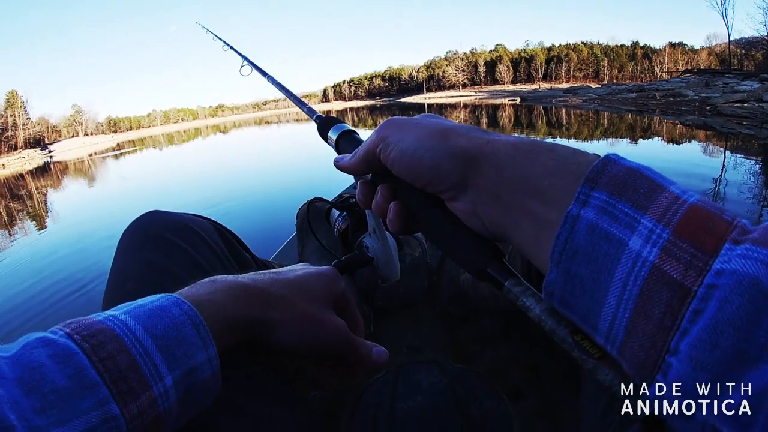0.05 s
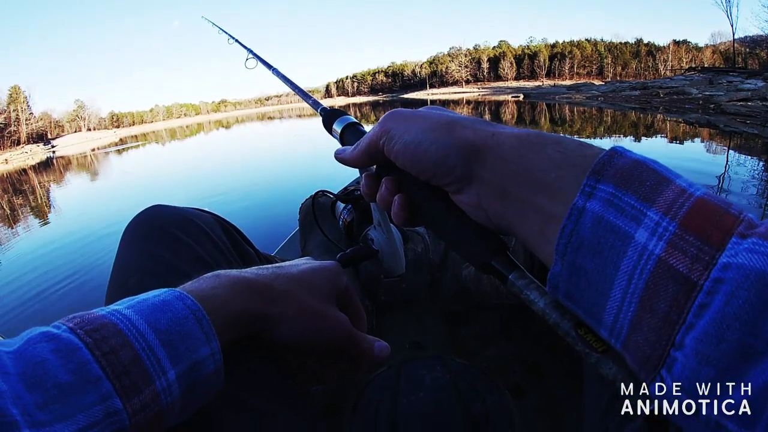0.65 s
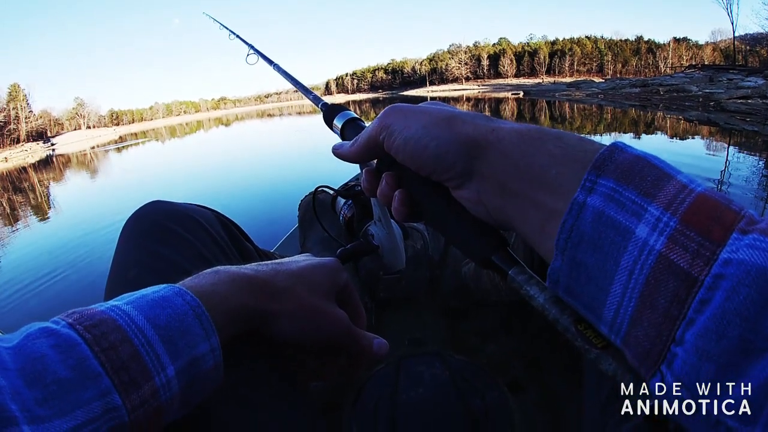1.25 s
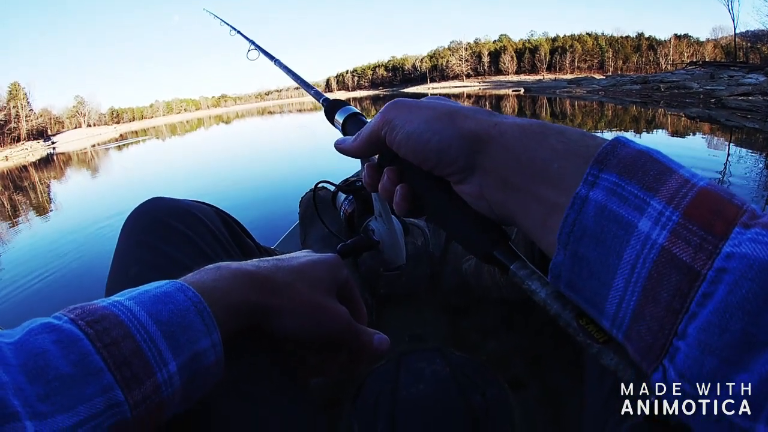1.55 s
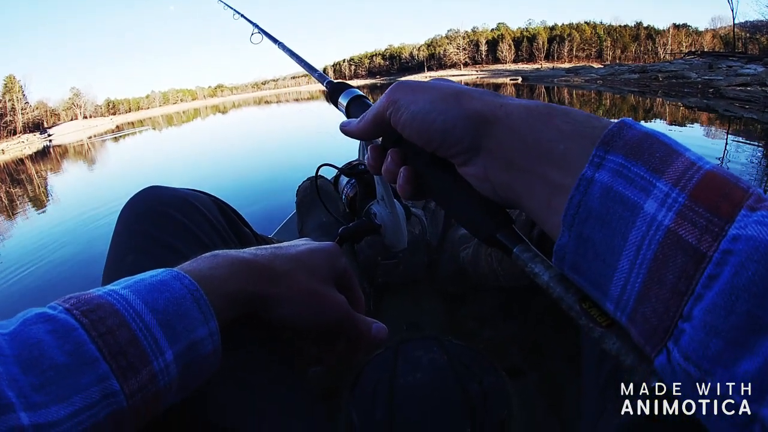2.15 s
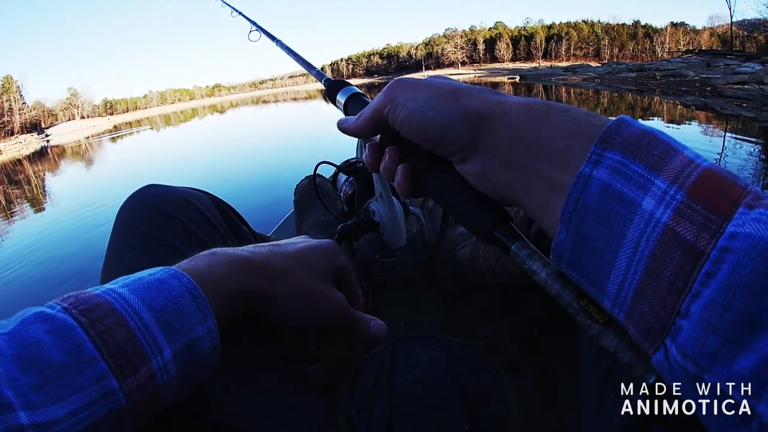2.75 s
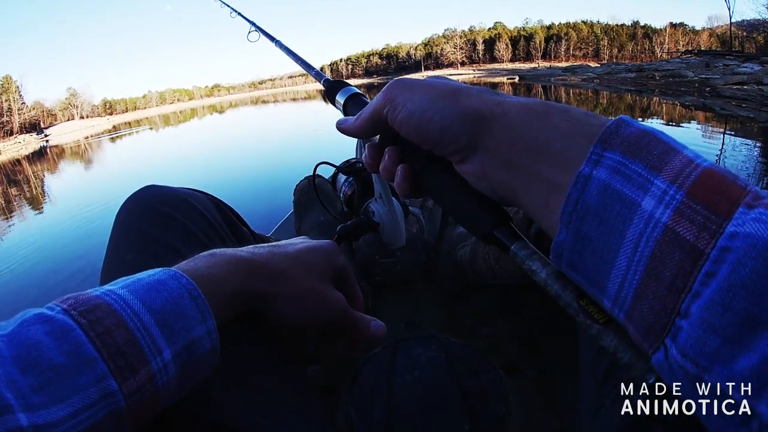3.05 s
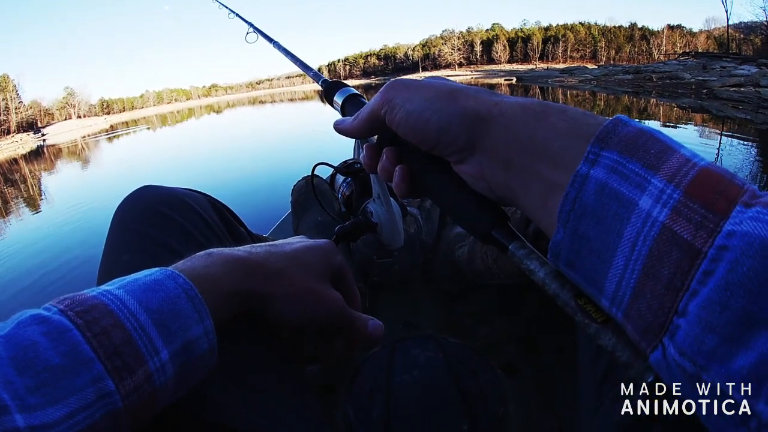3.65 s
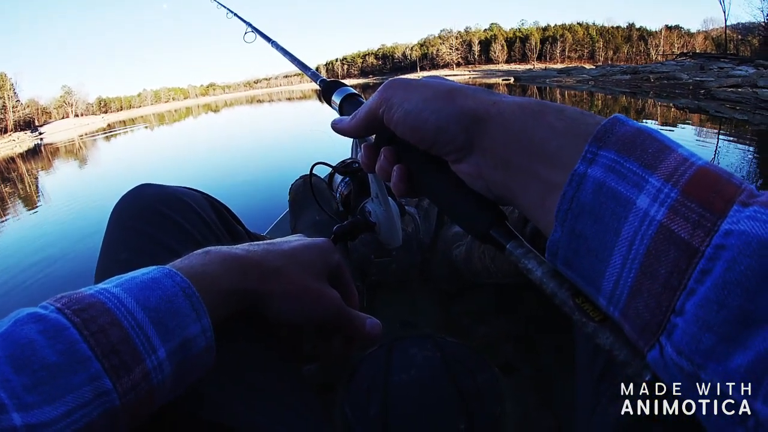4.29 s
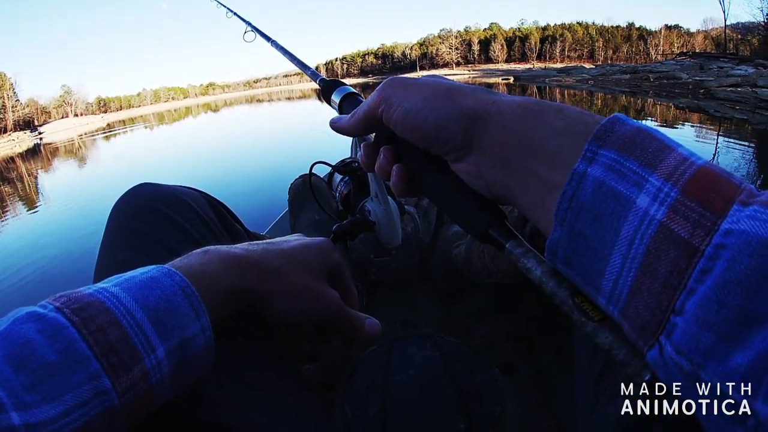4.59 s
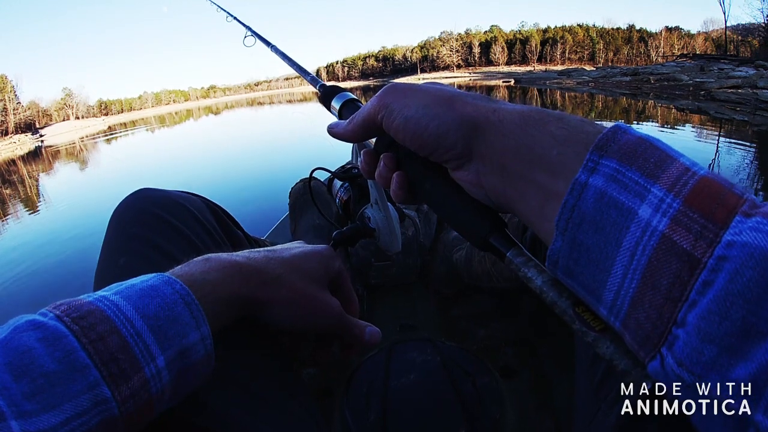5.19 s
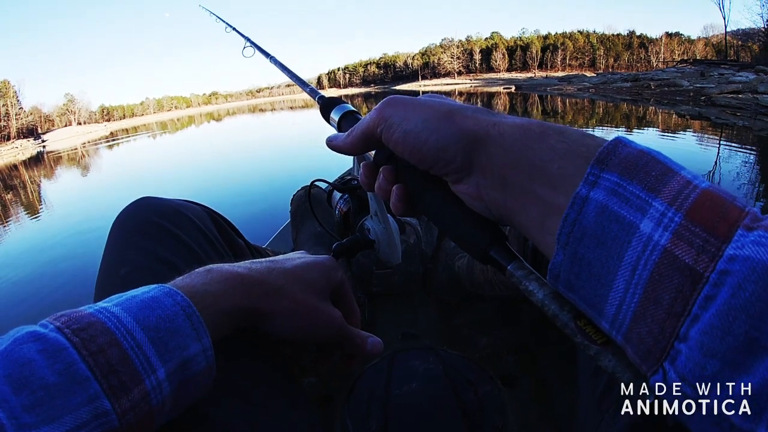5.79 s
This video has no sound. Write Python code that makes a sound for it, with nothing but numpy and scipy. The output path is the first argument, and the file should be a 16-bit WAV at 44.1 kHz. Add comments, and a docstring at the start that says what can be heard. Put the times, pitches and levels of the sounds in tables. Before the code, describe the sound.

A distant motor hums low throughout, with a rough rumble beneath it, swelling gently and easing a little after 4 seconds. A faint dull roar hangs over the lake, strongest around 1 to 2 seconds. At the start, water washes softly along a kayak's hull, and small plops follow here and there. From about 1.5 to 2.1 seconds a sleeve rustles close by and a hand bumps a fishing rod lightly several times, ending with a small metallic reel click. At 2.3 seconds a little splash breaks into drops and bubbles, with gurgling plops until 2.8. A second small splash starts with a sharp slap at 4.6 seconds and trickles away just after 5. A faint reel tick and a plop come near 5.8 seconds. The whole scene is quiet and free of echo, with a soft microphone hiss behind it.

```python
"""A far motor hums across a calm lake; only its low firing notes carry to a resting kayak.
Under a dull far roar, water washes along the hull and trapped air plops and gurgles.
Two small splashes break into drops and ringing bubbles. A sleeve rustles, a hand bumps
the fishing rod and the reel ticks. The camera adds a soft hiss and a very faint, even ticking."""
import sys
import numpy as np
from scipy import signal
from scipy.fft import rfft, irfft
from scipy.io import wavfile

SR = 44100
rng = np.random.default_rng(int(sys.argv[2]) if len(sys.argv) > 2 else 0)


def wav_out(sig):
    """Save sig, one row per channel (or a flat mono array), as 16-bit PCM at SR to the path in sys.argv[1]."""
    wavfile.write(sys.argv[1], SR, np.round(np.clip(np.atleast_2d(sig).T, -1, 1) * 32767).astype(np.int16))


N = 257103
TIME = np.arange(N) / SR
FREQS = np.fft.rfftfreq(N, 1 / SR)
TOP_HZ = 15700


def amp(db):
    """Turns decibels into a number to multiply by."""
    return 10 ** (np.asarray(db) / 20)

def unit(x):
    """Scales a signal to an average strength (rms) of 1."""
    return x / np.sqrt(np.mean(x ** 2) + 1e-20)

def curve(rows):
    """Joins (time, value) points with straight lines."""
    return np.interp(TIME, *np.transpose(rows))

def gain_at(tone, hz):
    """Reads gains from a tone table, which says how strong each frequency is next to the others."""
    points_hz, db = np.transpose(tone)
    return amp(np.interp(np.log(hz + 1), np.log(points_hz), db))

def colour(x, tone):
    """Filters a signal by a tone table, at strength 1."""
    return unit(irfft(rfft(x) * gain_at(tone, FREQS), N))

def noise(tone):
    """Steady noise with the given tone."""
    return colour(rng.standard_normal(N), tone)

def drift(hz):
    """A smooth random wander of strength 1, up to about hz fast."""
    return unit(irfft(rfft(rng.standard_normal(N)) * np.exp(-(FREQS / hz) ** 2), N))

def patchy(x, depth_db, rate_hz, count=9):
    """Splits a sound into bands from low to high and lets each flicker on its own."""
    place = np.interp(np.log(FREQS + 1), np.log([700, 11000]), [0, count - 1])
    spectrum = rfft(x)
    bands = (irfft(spectrum * np.maximum(1 - abs(place - k), 0), N) for k in range(count))
    return unit(sum(band * amp(depth_db * drift(rate_hz)) for band in bands))

def add(mix, start, sound):
    """Lays a sound into the mix, start seconds in."""
    part = mix[round(start * SR):][:len(sound)]
    part += sound[:len(part)]

def ringing(notes, t, tuning=1):
    """The notes of a struck part; each fades by 60 dB over its ring time."""
    return sum(amp(db) * np.exp(-np.log(1000) * t / ring_s) * np.sin(2 * np.pi * hz * tuning * t)
               for hz, db, ring_s in notes)

def air_note(t, hz, rise, rough, wobble_hz):
    """Air trapped in water sings a wobbling note that climbs by rise octaves a second."""
    turns = np.cumsum(hz * 2 ** (rise * t)) / SR
    rate, start = rng.random((2, 8, 1))
    wobble = np.exp(2j * np.pi * (wobble_hz * (2 * rate - 1) * t + start)).sum(0) / np.sqrt(len(rate))
    return (np.exp(2j * np.pi * turns) * (1 + rough * wobble)).imag

def bubble(hz, ring_s, rise, rough=0.62):
    """One bubble rings and fades, climbing in pitch as it nears the surface."""
    t = np.arange(0, ring_s, 1 / SR)
    onset = 1 - np.exp(-t / (0.054 * ring_s))
    fade = np.exp(-np.log(1000) * t / ring_s)
    return air_note(t, hz, rise, rough, wobble_hz=350) * onset * fade


# tone of the hiss: f/Hz, level/dB
HISS_TONE = [(100, 10), (2000, 2), (4200, -1.5), (5900, 3), (6400, -3), (7200, -1), (8000, -7.5),
             (9000, -9.5), (10200, -9), (11200, -16), (12600, -15.5), (13100, -32), (15500, -31)]
# tone of the electrical ticks: f/Hz, level/dB
TICK_TONE = [(4000, -12.5), (5700, -3), (7400, -1.5), (8300, -14), (10000, -16.5), (13000, -28),
             (15000, -47)]

def camera(hiss_db=-76, tick_db=-74, period_s=1 / 30, first_s=.0182, width_s=0.0025):
    """The microphone hisses, and the electronics tick faintly at an even pace."""
    from_tick = (TIME - first_s + period_s / 2) % period_s - period_s / 2
    pulses = np.exp(-(from_tick / width_s) ** 2)
    ticks = noise(TICK_TONE) * pulses * amp(tick_db + 2 * drift(60))
    return amp(hiss_db) * noise(HISS_TONE) + ticks


# tone of the far roar: f/Hz, level/dB
ROAR_TONE = [(120, -27.5), (220, -17), (290, -7), (400, -5.5), (500, -11), (660, -6.5), (850, -17),
             (1100, -31), (2200, -63.5)]
# its rise and fall, before trim_db is added: t/s, level/dB
ROAR_LEVEL = [(0, -65.5), (.6, -59.5), (1.0, -57.5), (1.2, -58), (1.45, -59), (1.8, -56), (1.97, -58.5),
              (2.11, -56), (2.25, -58.5), (2.75, -60), (3.1, -61), (4.3, -64.5), (4.82, -63), (5.1, -63),
              (5.83, -61.5)]

def far_roar(trim_db=-1):
    """A dull roar over the lake swells unevenly and settles."""
    return noise(ROAR_TONE) * amp(curve(ROAR_LEVEL) + trim_db + 0.3 * drift(5.2))


# tone of the washing water: f/Hz, level/dB
WASH_TONE = [(200, -13), (380, 15), (550, 0), (800, 6), (1100, 4.5), (1400, 4), (1800, -18), (3000, -16.5),
             (8000, -39)]
# crests of the low waves: t/s, level/dB
WAVE_CRESTS = [(.05, -63.5), (.9, -68.5), (1.55, -70.5), (2.5, -71.5)]

def hull_wash(calm_db=-81, rise_s=0.23, fall_db_per_s=17.5):
    """Each low wave builds up, then drains away along the hull."""
    power = amp(calm_db) ** 2
    for crest, db in WAVE_CRESTS:
        before, after = np.maximum(crest - TIME, 0), np.maximum(TIME - crest, 0)
        wave = np.exp(-(before / rise_s) ** 2) * amp(db - fall_db_per_s * after)
        power = power + wave ** 2
    return noise(WASH_TONE) * np.sqrt(power) * amp(drift(23))

def ripples(count=60, middle_hz=670):
    """Tiny waves plop against the hull at random."""
    out = np.zeros(N)
    for when, size, pitch in rng.random((count, 3)):
        hz = middle_hz * 2 ** (.4 * (pitch - .5))
        add(out, when * TIME[-1], amp(-63 + 1.3 * size) * bubble(hz, ring_s=0.027, rise=0.71))
    return out


# tone of the sleeve sliding on the jacket: f/Hz, level/dB
SLEEVE_TONE = [(300, -23.5), (900, -0.5), (1200, 4.5), (1450, 8), (1750, -1), (2250, -10), (2750, 0.5),
               (3200, -3.5), (4000, -2), (5500, -6.5), (7600, -5.5), (9000, -17), (12500, -38),
               (15000, -56)]
# its loudness as the arm shifts: t/s, level/dB
SLEEVE_LEVEL = [(0.1, -74), (.3, -85), (1.45, -88), (1.58, -66), (1.66, -77), (1.77, -64), (1.86, -69.5),
                (1.95, -66.5), (2.06, -68.5), (2.17, -85)]

def sleeve(grain_db=1.9):
    """Cloth fibres slip in small clumps, making one unbroken scrape that follows the arm."""
    scrape = patchy(noise(SLEEVE_TONE), depth_db=2, rate_hz=49)
    return scrape * amp(curve(SLEEVE_LEVEL) + grain_db * drift(110))


# knocks of the hand: t/s, peak level/dB, contact pitch/Hz, spread around it/octaves, scuff time/s
KNOCKS = [(1.5929, -48, 4000, .5, 0.0017), (1.5944, -42.5, 2100, 1.15, .0006),
          (1.6999, -43, 794, 0.15, .0003), (1.825, -46, 2140, .38, 0.0027), (1.8902, -46.5, 4070, .2, .002)]
# notes of the rod and its grip: f/Hz, level/dB, ring time/s
ROD_NOTES = [(820, -5, 0.02), (1320, 2, 0.015), (1780, -10.5, 0.011), (2800, -3.5, 0.009),
             (3980, -5, 0.0067), (4740, -4, 0.0043)]

def rod(scuff=0.086, reach_octaves=1.1):
    """A hand bumps the rod; each soft, scuffing touch wakes mostly the notes near its own pitch."""
    out, t = np.zeros(N), np.arange(0, .03, 1 / SR)
    for start, db, contact_hz, spread, scuff_s in KNOCKS:
        push = scuff * rng.standard_normal(len(t)) * np.exp(-t / scuff_s)
        push[0] = 1
        cutoff_hz = min(contact_hz * 2 ** reach_octaves, TOP_HZ)  # a soft fingertip dulls the knock
        push = signal.lfilter(*signal.butter(2, cutoff_hz, fs=SR), push)
        notes = [(hz, note_db - 10 * np.log10(1 + (np.log2(hz / contact_hz) / spread) ** 4), ring_s)
                 for hz, note_db, ring_s in ROD_NOTES]
        knock = signal.fftconvolve(push, ringing(notes, t))
        add(out, start, amp(db) * knock / abs(knock).max())
    return out


# ticks of the reel: t/s, peak level/dB, tuning (multiplies each note's frequency)
REEL_TICKS = [(1.7075, -59, 1.3), (1.8245, -65, 1.2), (1.89, -58, 1.05), (2.05, -41, 0.983),
              (5.7830, -63.5, 1.36)]
# notes of the reel: f/Hz, level/dB, ring time/s
REEL_NOTES = [(5600, -10, 0.0048), (6740, 6.5, 0.0036), (8070, -10, 0.012), (9300, -22, 0.0046),
              (12200, -35, .004)]
# notes of its spring, shaken by a knock: f/Hz, level/dB, ring time/s
SPRING_NOTES = [(13800, -81, 0.06), (14100, -82, .07)]

def reel(onset_s=0.00043, spring_start_s=1.703):
    """Small metal parts of the reel click into place, and its spring sings briefly."""
    out, t = np.zeros(N), np.arange(0, .08, 1 / SR)
    for start, db, tuning in REEL_TICKS:
        tick = ringing(REEL_NOTES, t, tuning) * (1 - np.exp(-t / onset_s))
        add(out, start, amp(db) * tick / abs(tick).max())
    add(out, spring_start_s, ringing(SPRING_NOTES, t))
    return out


# plops, which hold nearly one note: t/s, level/dB, starting f/Hz, length/s
PLOPS = [(.611, -59, 670, .022), (.778, -51.5, 640, .025), (1.209, -54, 693, .022), (1.646, -57, 820, .012),
         (2.551, -50.5, 664, 0.026), (2.655, -54, 607, 0.021), (2.761, -50, 645, .016),
         (2.085, -53.5, 630, 0.044), (3.605, -57, 625, .03), (4.742, -56.5, 650, 0.017),
         (5.035, -60, 740, .035), (5.804, -58, 690, .02)]
# gurgles, which climb fast: t/s, level/dB, starting f/Hz, length/s
GURGLES = [(2.497, -57.5, 930, 0.027), (2.604, -65, 1020, 0.03), (4.707, -57.5, 870, 0.045),
           (4.938, -56, 514, 0.06), (4.971, -60, 822, 0.045)]

def air_pockets(plop_rise=2.2, gurgle_rise=12.5):
    """Air is squeezed against the hull: each note swells, climbs and closes."""
    out = np.zeros(N)
    for rows, rise in (PLOPS, plop_rise), (GURGLES, gurgle_rise):
        for start, db, hz, length in rows:
            t = np.arange(0, length, 1 / SR)
            swell = np.sin(np.pi * (t / length) ** 0.34) ** 2
            add(out, start, amp(db) * swell * air_note(t, hz, rise, rough=0.18, wobble_hz=130))
    return out


# the two splashes: t/s, level/dB, hold time/s, level of the lingering trickle/dB
SPLASHES = [(2.319, -65.5, 0.1, -100), (4.588, -69, 0.2, -84.5)]

def splash_level(onset_s=0.025, fall_db_per_s=37):
    """The loudness that spray and drips follow: a quick rise, a hold, then a fall to a trickle."""
    level = np.zeros(N)
    for start, db, hold_s, trickle_db in SPLASHES:
        onset = np.clip((TIME - start) / onset_s, 0, 1)
        fall_db = fall_db_per_s * np.maximum(TIME - start - hold_s, 0)
        level += onset * np.hypot(amp(db - fall_db), amp(trickle_db))
    return level


# tone of the fine spray: f/Hz, level/dB
SPRAY_TONE = [(400, -8), (1000, 7), (1500, 10), (2000, 2), (2800, 8), (3300, 6.5), (4000, 4.5), (5700, 5.5),
              (6800, 1), (8000, -4), (10200, -10), (12500, -25), (15000, -43)]

def spray(drops_per_s=1300, mist=0.21, bubble_count=1700, patter_db=1, fizz_db=9):
    """Fine drops rain back in clumps after a splash, and some trap tiny bubbles."""
    drops = rng.standard_normal(N) * (mist + (rng.random(N) < drops_per_s / SR))
    fizz = np.zeros(N)
    for when, size, pitch in rng.random((bubble_count, 3)):
        hz = 950 * 3.6 ** pitch
        ring = bubble(hz, ring_s=45 / hz, rise=5.6)  # small, high bubbles die sooner
        add(fizz, when * TIME[-1], size ** 3 * ring)
    patter = patchy(colour(drops, SPRAY_TONE), depth_db=3, rate_hz=140)
    return splash_level() * (amp(patter_db) * patter + amp(fizz_db) * fizz)

def drips(count=110, middle_hz=2750, spread_octaves=0.58, boost_db=8):
    """Larger drops fall among the spray, each a short plink."""
    out = np.zeros(N)
    for when, size, pitch in rng.random((count, 3)):
        hz = middle_hz * 2 ** (spread_octaves * (pitch - .5))
        add(out, when * TIME[-1], size * bubble(hz, ring_s=0.045, rise=2.1))
    return amp(boost_db) * splash_level() * out


# larger bubbles from the splashes: t/s, level/dB, starting f/Hz, ring time/s
BUBBLES = [(2.3507, -41.5, 3300, .010), (2.383, -51, 1330, 0.023), (2.399, -52.5, 1470, 0.017),
           (2.372, -52, 2760, 0.017), (2.461, -57, 2750, 0.047), (2.473, -57, 2300, 0.026),
           (2.548, -54.5, 2610, 0.033), (4.646, -55, 1330, .03), (4.708, -47, 1520, .017),
           (4.7526, -43, 2420, 0.021), (4.799, -50.5, 1025, 0.036), (4.8373, -51.5, 3280, 0.021),
           (4.841, -54, 1425, 0.033), (5.014, -61, 3200, 0.017)]

def big_bubbles(pop_s=0.00049, fizz_octaves=0.52):
    """Each bubble pinches off with a pop and rings in wet fizz."""
    out = np.zeros(N)
    for start, db, hz, ring_s in BUBBLES:
        ring = bubble(hz, ring_s, rise=1.8, rough=0.39)
        t = np.arange(len(ring)) / SR
        edges_hz = hz * 2 ** (fizz_octaves * np.array([-.5, .5]))
        band = signal.butter(3, edges_hz, "band", fs=SR, output="sos")
        fizz = unit(signal.sosfilt(band, rng.standard_normal(2 * len(t)))[len(t):])
        pop = 0.175 * t / pop_s * np.exp(1 - t / pop_s)
        wet_tail = 0.077 * np.sin(np.pi * np.sqrt(t / ring_s))
        add(out, start, amp(db) * (ring + fizz * (pop + wet_tail)))
    return out


# slaps of water and falling drops: t/s, peak level/dB, lowest f/Hz, highest f/Hz, fade time/s
SLAPS = [(2.25, -59.5, 1300, 1910, 0.014), (2.312, -57, 2300, 3400, 0.0037),
         (2.3492, -39, 3020, 6500, 0.0026), (2.3516, -34, 3800, 15000, 0.0011),
         (2.358, -46, 5000, 8000, .001), (2.4089, -38.5, 2180, 13500, 0.0016),
         (2.4125, -47.5, 2300, 3800, 0.0066), (2.413, -50.5, 4500, 11000, 0.006),
         (2.585, -58, 3000, 7000, 0.0024), (2.637, -51, 4200, 6950, 0.0022), (2.687, -60, 2200, 3300, .002),
         (2.712, -62, 2400, 4000, 0.0017), (2.766, -57.5, 2000, 3300, 0.00096),
         (4.593, -51.5, 2695, 4400, 0.0016), (4.6198, -29, 500, 7850, 0.0007),
         (4.698, -49, 2200, 5070, 0.0063), (4.703, -55, 3500, 10000, 0.0018),
         (4.8, -54, 3400, 9000, 0.0018), (4.826, -52.5, 5000, 9000, 0.0017),
         (4.838, -57, 2800, 8000, 0.0018), (4.934, -63, 2600, 4000, 0.0012),
         (5.002, -63, 1800, 3000, .0012)]
# tone of a slap: f/Hz, level/dB
SLAP_TONE = [(300, 11), (750, 12), (1150, 0), (1500, 8), (2050, -6), (2550, 6.5), (3150, 10), (3900, -7),
             (4300, -2.5), (5400, -3.5), (6000, 1), (7050, 4), (7800, -5), (8400, -3.5), (10200, -4),
             (11200, -19), (12700, -21), (13800, -22), (15500, -41)]

def slaps(full_spatter_s=.009):
    """Water meets water: one sharp pulse and a brief spatter behind it."""
    out, t = np.zeros(N), np.arange(2048) / SR
    hz = np.fft.rfftfreq(2 * len(t), 1 / SR)
    for start, db, low_hz, high_hz, fade_s in SLAPS:
        spatter = min(fade_s / full_spatter_s, 1)  # the briefest slaps are almost a clean pulse
        burst = spatter * rng.standard_normal(len(t)) * np.exp(-t / fade_s)
        burst[0] = -1
        low_cut, high_cut = 1 + (low_hz / (hz + 50)) ** 6, 1 + (hz / high_hz) ** 8
        gain = gain_at(SLAP_TONE, hz) / np.sqrt(low_cut * high_cut)
        # a "minimum phase" filter: nothing sounds before the impact
        log_gain = np.log(np.r_[gain, gain[-2:0:-1]])
        response = np.exp(np.conj(signal.hilbert(log_gain)))[:len(hz)]
        slap = irfft(rfft(burst, 2 * len(t)) * response)
        add(out, start, amp(db) * slap / abs(slap).max())
    return out


# tone of the motor's rumble: f/Hz, level/dB
RUMBLE_TONE = [(20, -5), (35, -6), (52, 3.5), (85, 3), (135, 1), (170, 3), (225, 1.5), (260, -7),
               (330, -19), (600, -74)]
# its loudness: t/s, level/dB
RUMBLE_LEVEL = [(0, -54), (1.8, -53.5), (2.7, -55), (3.6, -52.5), (4.5, -57.5), (5.83, -55)]

def motor_rumble():
    """The far motor makes a low, rough noise under its hum."""
    return noise(RUMBLE_TONE) * amp(curve(RUMBLE_LEVEL))


# pitch of the motor's lowest note: t/s, f/Hz
HUM_PITCH = [(0, 94.9), (1.2, 96.42), (2.6, 96.8), (3.7, 97.24), (5.83, 96.2)]
# that note fades as the motor draws away: t/s, level/dB
HUM_LEVEL = [(0, -44.5), (1.5, -48.5), (2.6, -49), (4.05, -47.5), (4.8, -51.5), (5.83, -52.5)]
# moments when it carries better over the water: t/s, extra level/dB
HUM_SWELLS = [(.25, 4), (1.059, 5.5), (2.0, 4), (2.88, 4.5), (3.25, 4), (3.71, 5.5)]
# the note an octave higher, before upper_trim_db is added: t/s, level/dB
OCTAVE_LEVEL = [(0, -55), (.95, -53), (1.25, -55.5), (2.6, -51), (2.8, -55.5), (3.7, -53.5), (4.4, -59.5),
                (5.83, -61)]
# weak notes above those: multiple of the lowest pitch, level/dB next to the octave note
OVERTONES = [(3, -30), (4, -21.5)]

def motor_hum(waver=0.0014, swell_s=0.18, flutter_db=.5, upper_trim_db=-3):
    """Only the motor's lowest firing notes carry this far; moving air makes them swell and waver."""
    hz = curve(HUM_PITCH) * (1 + waver * drift(6.2))
    phase = 2 * np.pi * np.cumsum(hz) / SR
    lift_db = sum(db * np.exp(-((TIME - crest) / swell_s) ** 2) for crest, db in HUM_SWELLS)
    lowest = amp(curve(HUM_LEVEL) + lift_db + flutter_db * drift(28)) * np.sin(phase)
    upper = np.zeros(N)
    for multiple, db in [(2, 0)] + OVERTONES:
        upper += amp(db + drift(9.8)) * np.sin(multiple * phase + rng.uniform(0, 2 * np.pi))
    return np.sqrt(2) * (lowest + amp(curve(OCTAVE_LEVEL) + upper_trim_db) * upper)


def scene():
    """Adds everything into one channel, in open air with no echo."""
    lake = far_roar() + hull_wash() + ripples()
    splashing = spray() + drips() + slaps() + big_bubbles()
    water = lake + splashing + air_pockets()
    motor = motor_hum() + motor_rumble()
    return (motor + water + sleeve() + rod() + reel() + camera())[None]

def record(dry):
    """Cuts away the treble above TOP_HZ."""
    low_pass = signal.firwin(511, TOP_HZ, window=("kaiser", 9), fs=SR)
    return signal.oaconvolve(dry, low_pass[None], "same")


dry = scene()
out = record(dry)
wav_out(out)
```